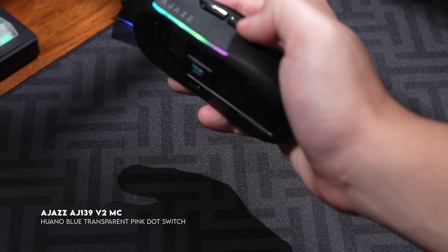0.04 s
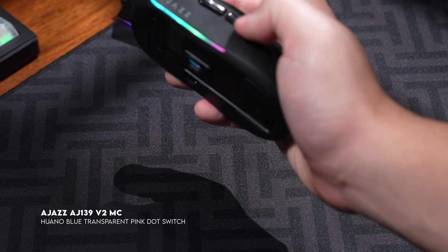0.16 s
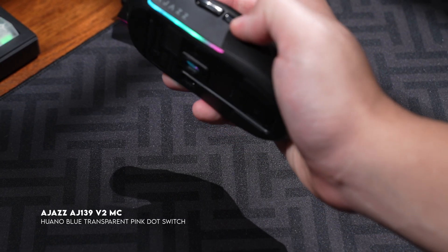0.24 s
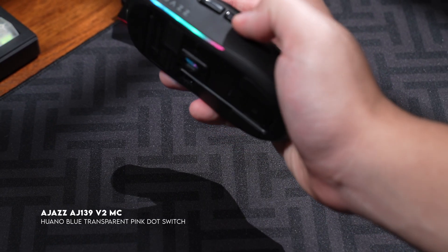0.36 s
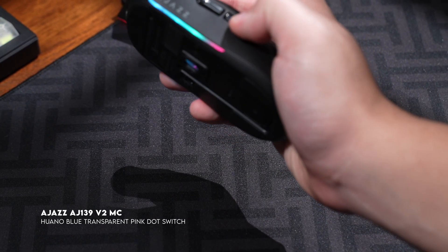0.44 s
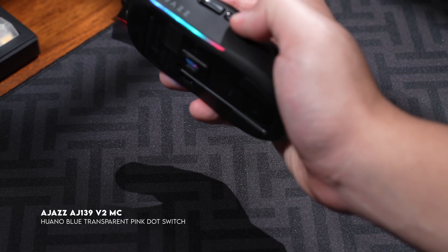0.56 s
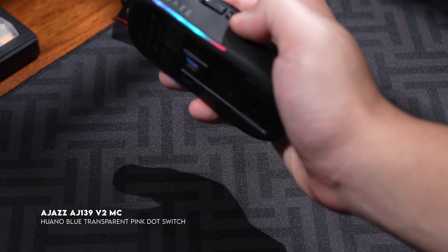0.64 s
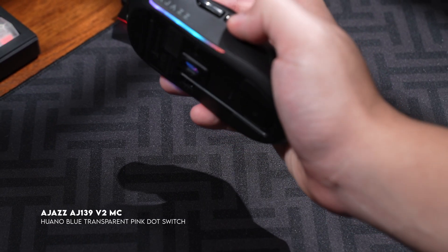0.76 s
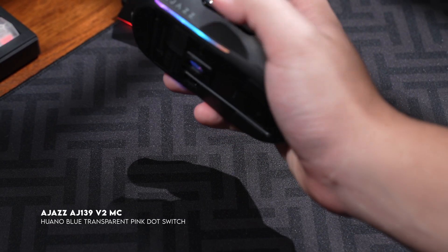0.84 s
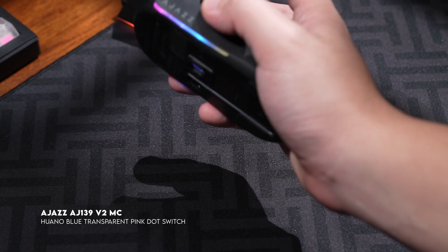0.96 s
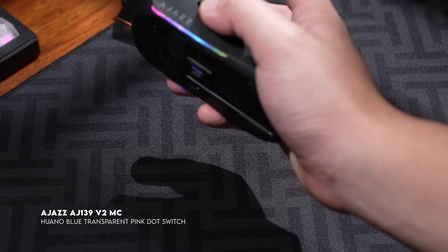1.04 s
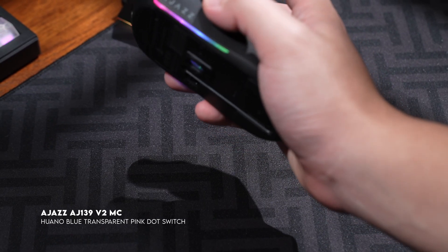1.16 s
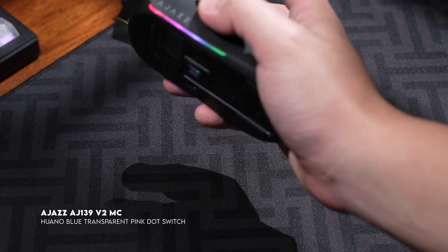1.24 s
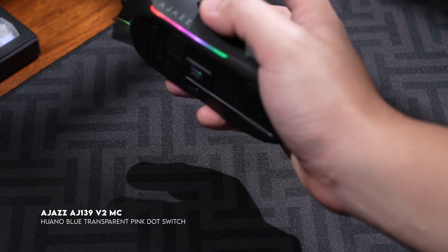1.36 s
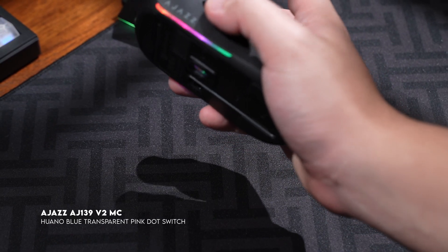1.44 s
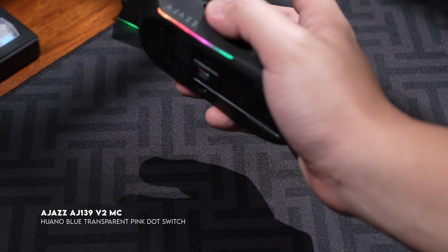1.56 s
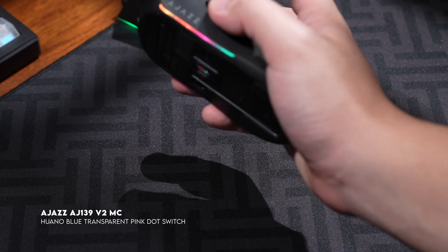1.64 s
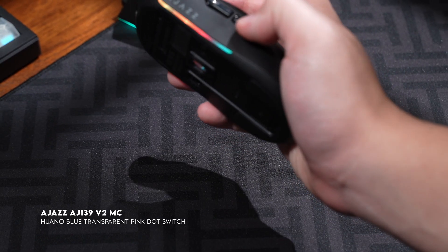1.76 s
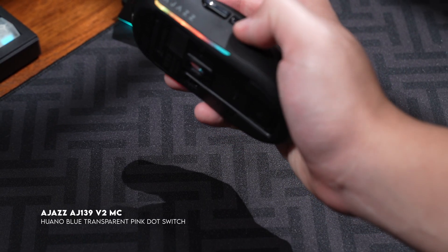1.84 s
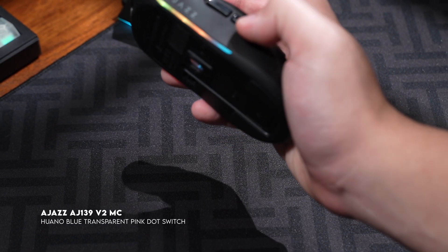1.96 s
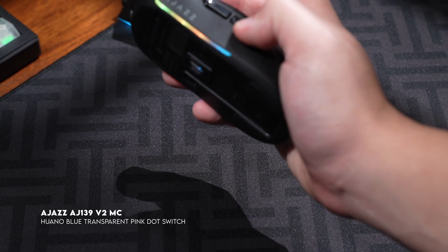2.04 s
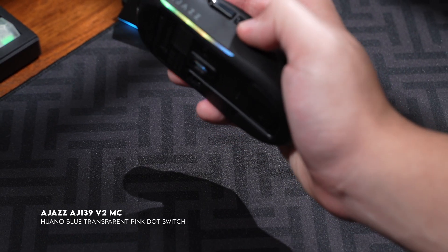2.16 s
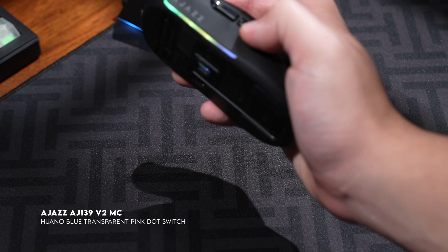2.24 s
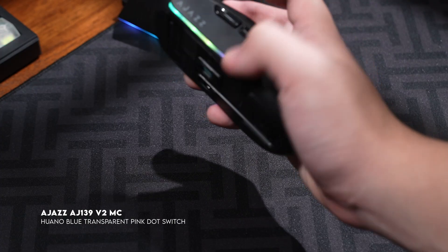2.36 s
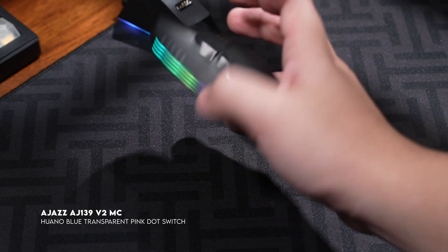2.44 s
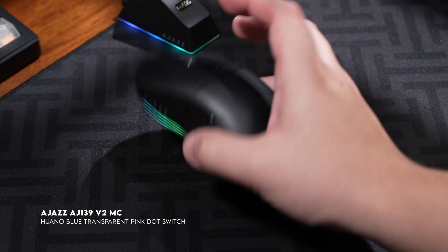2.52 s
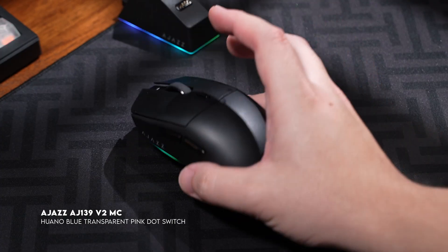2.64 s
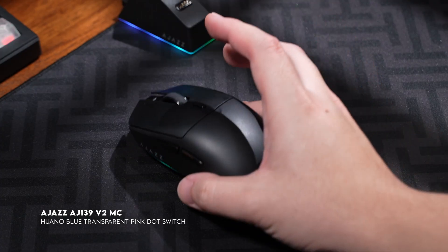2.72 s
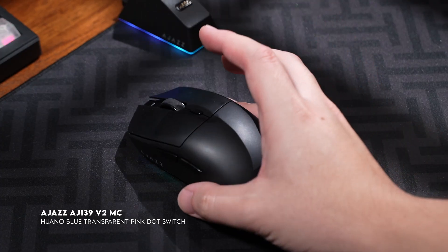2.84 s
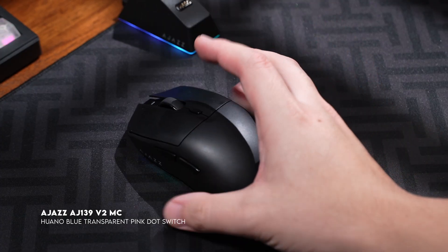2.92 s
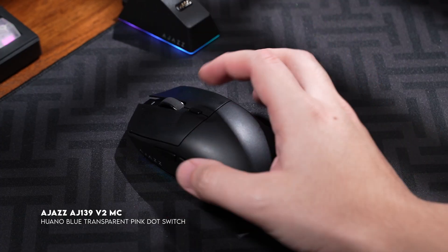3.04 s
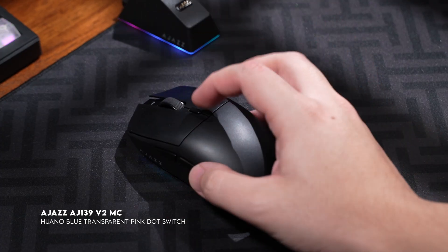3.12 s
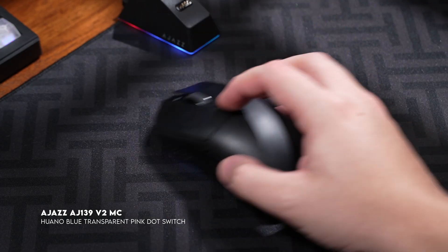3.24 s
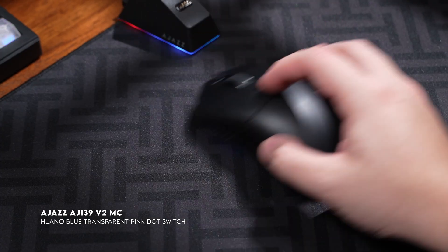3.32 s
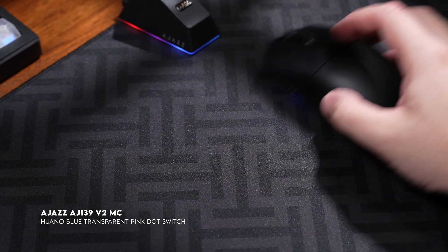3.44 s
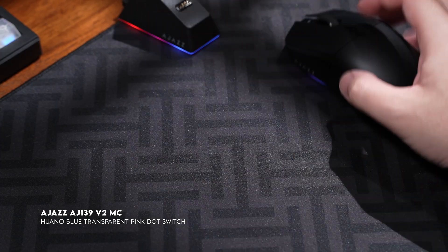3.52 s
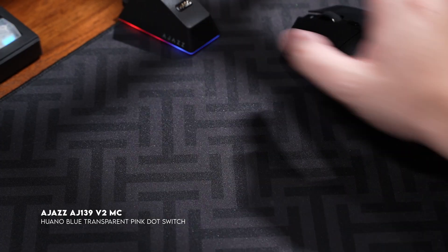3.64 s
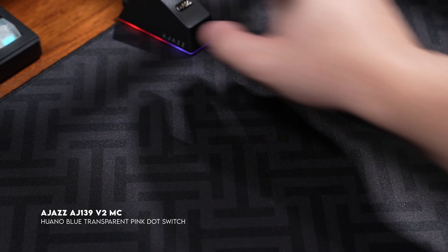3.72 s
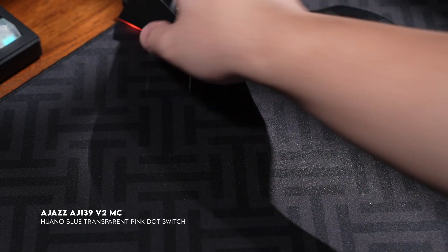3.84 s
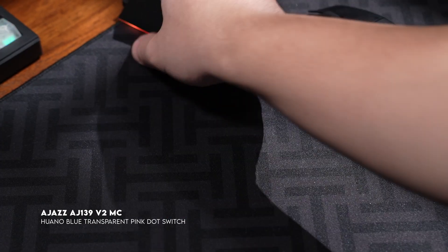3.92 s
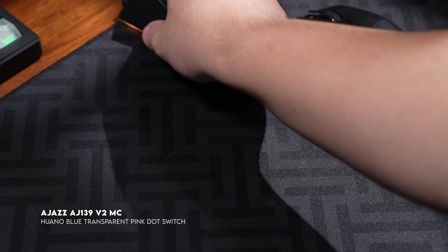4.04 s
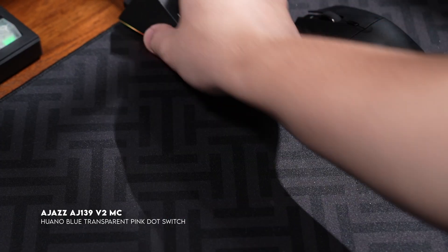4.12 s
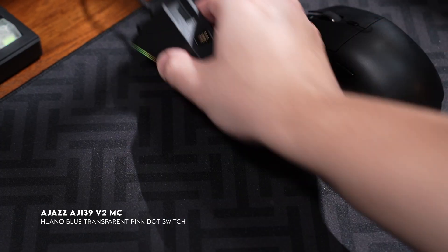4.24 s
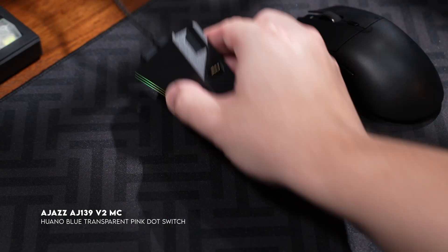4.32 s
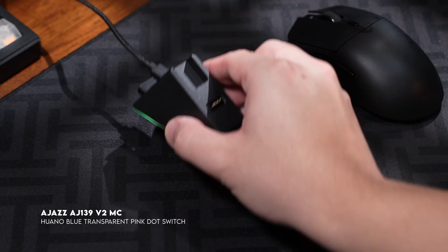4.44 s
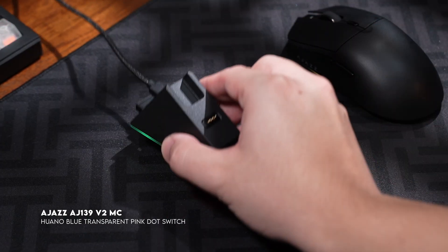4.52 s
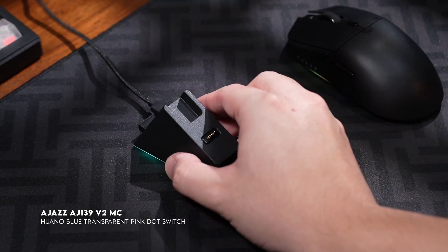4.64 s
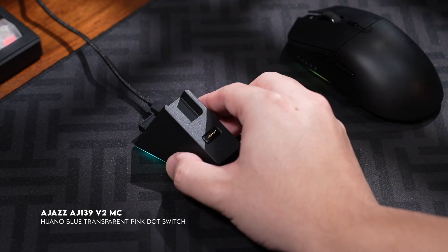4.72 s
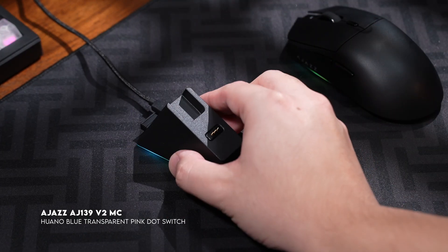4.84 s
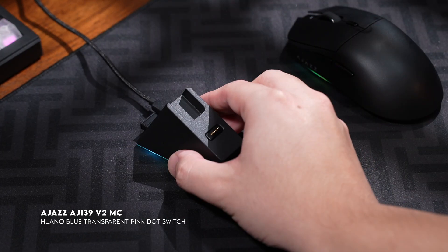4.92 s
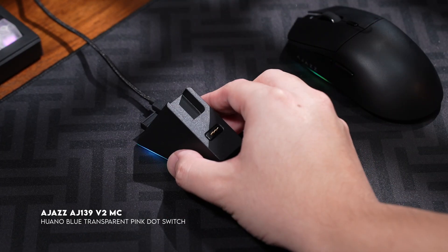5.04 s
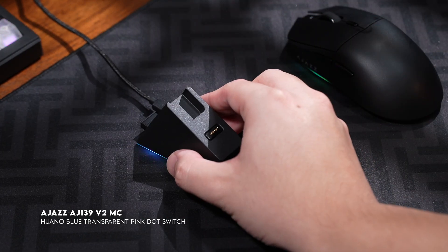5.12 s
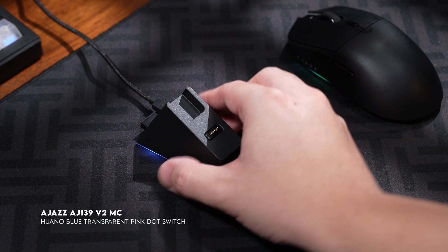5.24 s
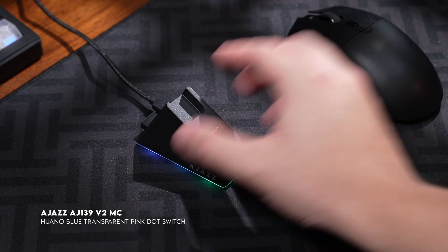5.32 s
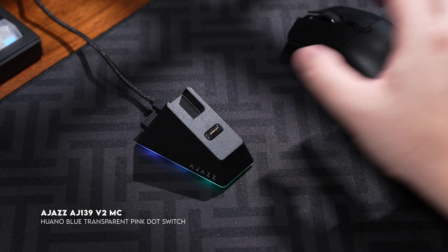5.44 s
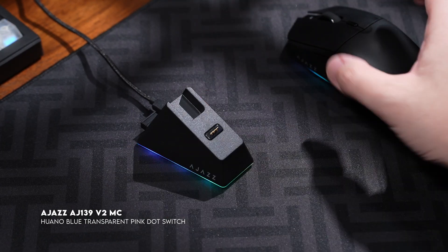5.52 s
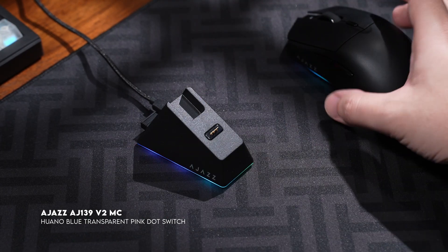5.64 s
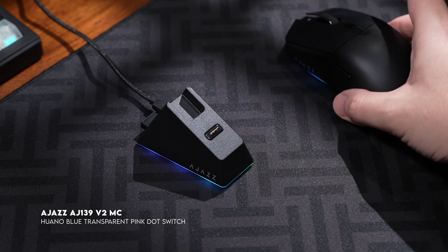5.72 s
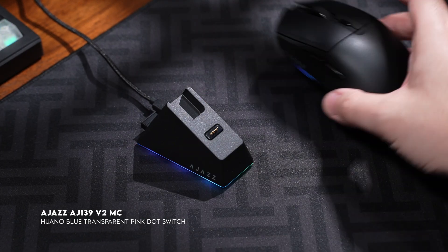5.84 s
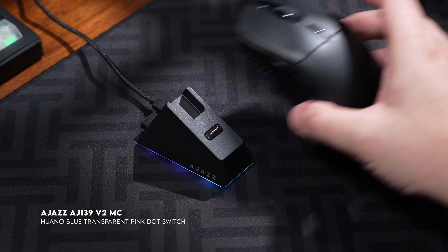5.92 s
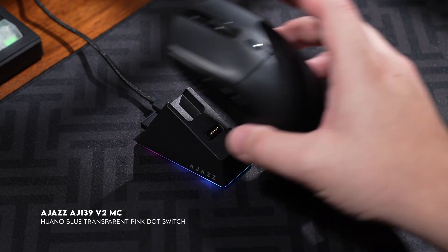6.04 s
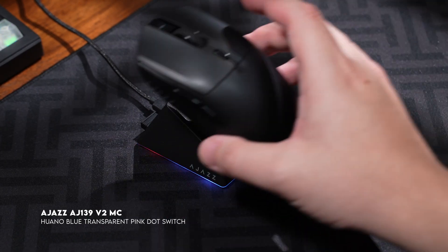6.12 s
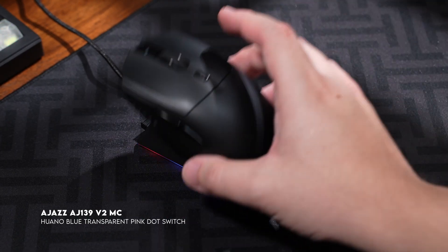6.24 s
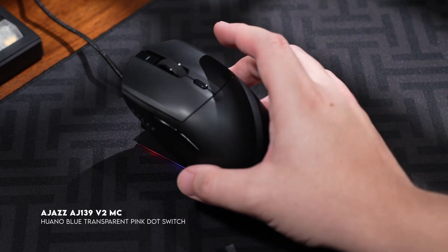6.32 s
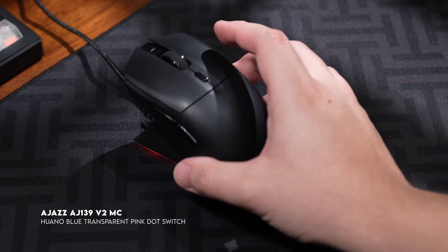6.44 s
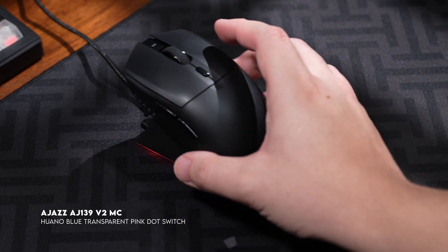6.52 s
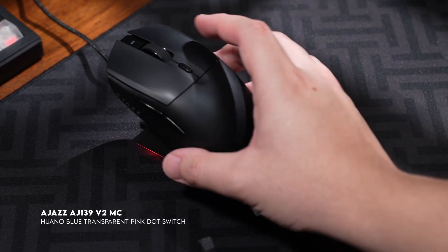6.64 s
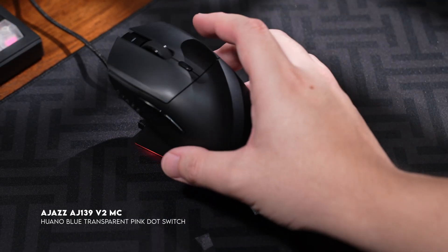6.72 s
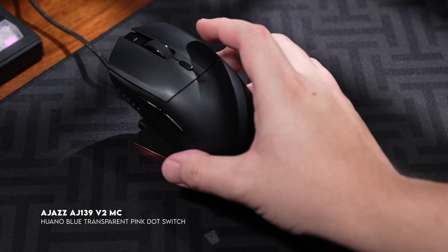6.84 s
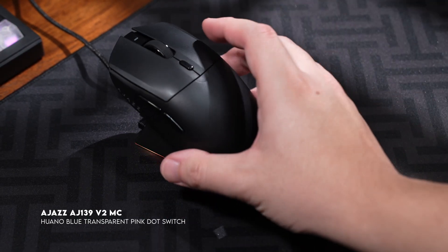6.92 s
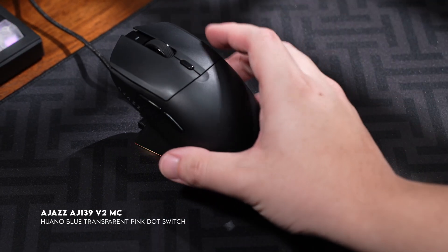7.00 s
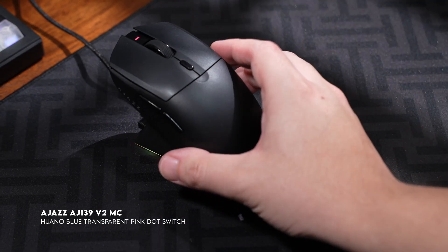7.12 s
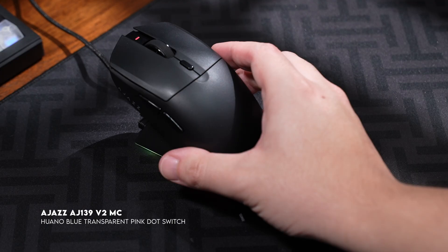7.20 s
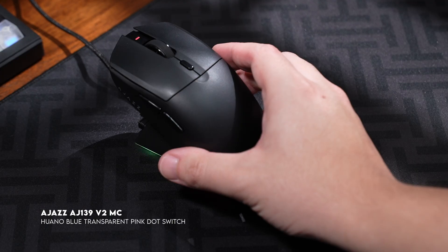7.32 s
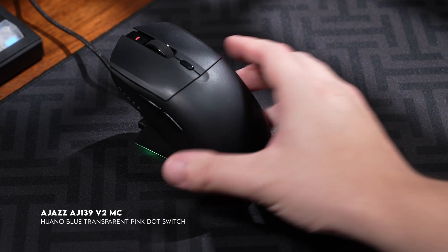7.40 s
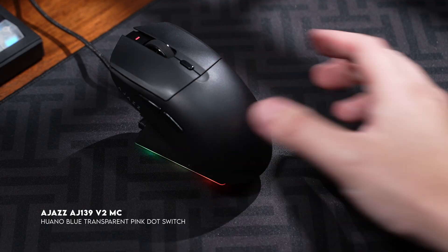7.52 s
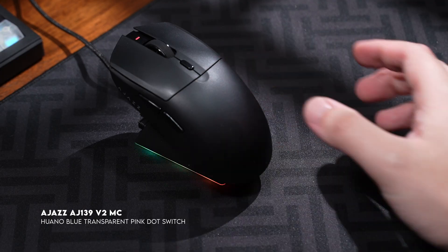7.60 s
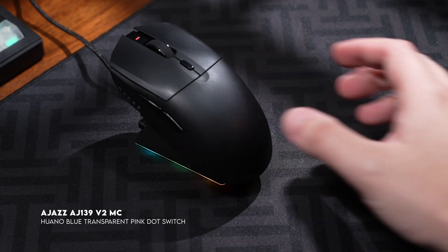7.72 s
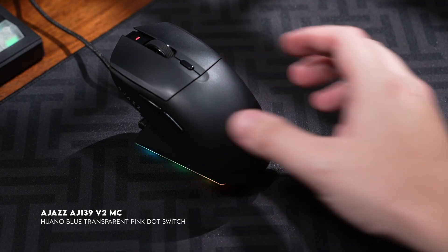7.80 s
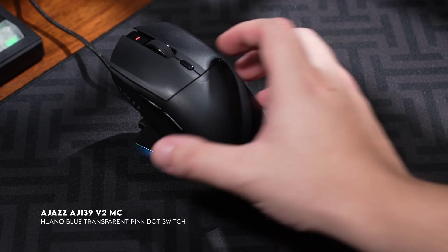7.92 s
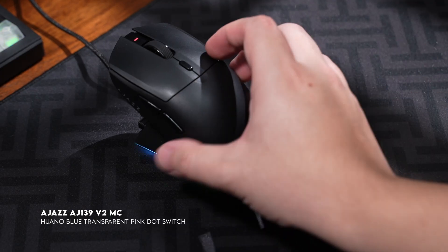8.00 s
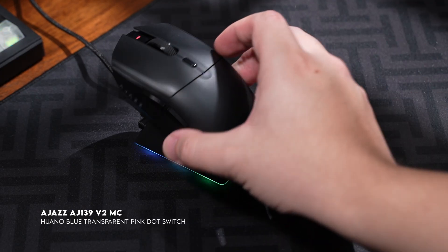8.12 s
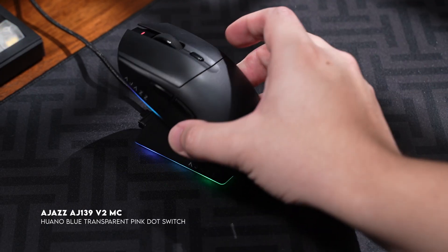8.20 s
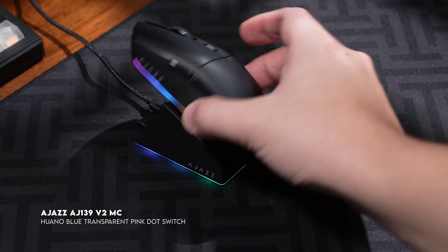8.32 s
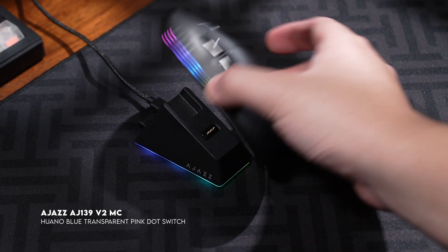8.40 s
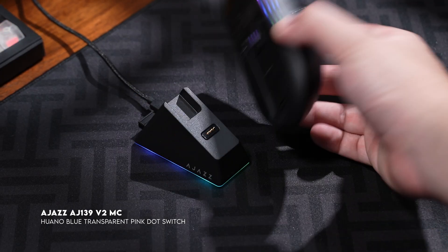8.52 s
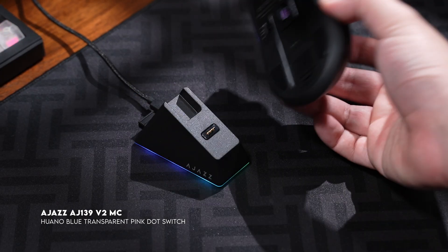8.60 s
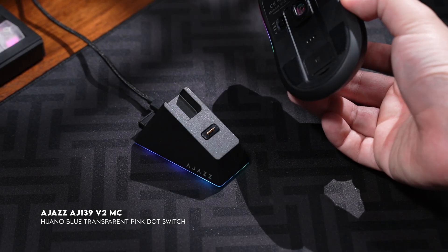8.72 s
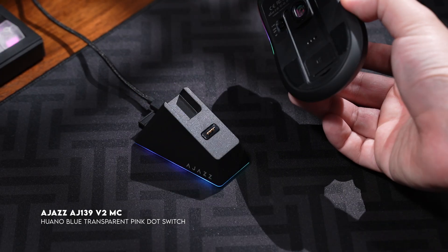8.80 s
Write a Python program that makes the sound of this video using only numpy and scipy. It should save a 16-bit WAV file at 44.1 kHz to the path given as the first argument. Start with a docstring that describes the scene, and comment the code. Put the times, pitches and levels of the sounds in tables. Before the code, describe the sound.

Crisp computer mouse clicks, press and release, for two seconds, then near quiet, a dock's thump, and sharp plastic knocks as the mouse seats on it.

```python
"""A desk in a quiet room, the microphone close to the hand. First a hand clicks the two buttons of a computer mouse,
then lays the mouse on a cloth pad, slides it aside, sets a plastic dock down, seats the mouse on it and handles it
lightly. Clicks and knocks are ringing modes and noise bursts with a short echo; strokes are shaped friction noise.
Underneath: a low hum and distant air made of filtered noise, one thin steady electronic whine and another that
comes and goes."""
import sys
import numpy as np
from scipy import signal
from scipy.fft import rfft, irfft, next_fast_len
from scipy.io import wavfile
from scipy.ndimage import uniform_filter1d, map_coordinates

SR = 44100
rng = np.random.default_rng(int(sys.argv[2]) if len(sys.argv) > 2 else 0)


def transcribe(u):
    """Save the signal u as a 16-bit wav file named by the first command-line argument.

    u: samples, shape (n,) or (channels, n), limited to [-1, 1]; the rate is SR.
    q: integer samples, one column per channel.
    """
    v = np.clip(np.atleast_2d(u).T, -1, 1)
    q = np.round(v * 32767).astype(np.int16)
    wavfile.write(sys.argv[1], SR, q)


N = 390726

# Two buttons snap down and up, a finger brushes or touches one, one comes to rest:
# (time [s], level [dB], kind)
CLICKS = [(0.0125, -26.5, "near down"), (0.2691, -28, "far down"), (0.402, -27, "far up"),
          (0.468, -38, "touch"), (0.4952, -28, "far down"), (0.6212, -25, "far up"), (0.68, -32, "touch"),
          (0.6963, -27, "far down"), (0.835, -26.5, "far up"), (0.8404, -27, "rest"),
          (0.967, -53.5, "brush"), (0.987, -57.5, "brush"), (1.0137, -28.5, "near down"),
          (1.036, -47.5, "brush"), (1.1476, -25, "near up"), (1.205, -49, "brush"),
          (1.2183, -35.5, "touch"), (1.2319, -26, "near down"), (1.3546, -24.5, "near up"),
          (1.5686, -27, "near down"), (1.6949, -24.5, "near up"), (1.7358, -36, "rest"),
          (1.8567, -28.5, "far down"), (1.9869, -25, "far up"), (2.0405, -30.5, "touch"),
          (2.0592, -27, "far down"), (2.174, -26, "far up"), (2.2131, -28.5, "far down"),
          (2.3206, -26.5, "far up"), (2.4337, -40.5, "touch"), (2.524, -56.5, "touch")]
# How hard each kind rings the parts, re the click level:
# kind: (spring [dB], shell [dB], button [dB], plunger [dB], contact [dB], blade [dB])
PART_LEVELS = {"near down": (-2, -7, -7.5, -0.4, -9, -7), "near up": (0, -11.5, -13, -2, -6, -16),
               "far down": (1, -3, -10, -13, -8, -10), "far up": (-0.5, -2.1, -4.5, -5.5, -8, -17.5),
               "brush": (-24, 3.5, -4.7, -9.5, -35, -37), "touch": (-8, -4, -2.5, -9.5, -28.5, -26),
               "rest": (-10.5, 0.8, -5.5, -10, -27, -46)}
# Modes of the parts of the mouse, each: (frequency [Hz], relative level [dB], t60 [s])
SPRING = [(5800, 0.64, 0.0079), (6524, 15, 0.0076), (6610, 2.5, 0.016), (7140, 16, 0.0045),
          (7380, 8.3, 0.0053)]
SHELL = [(870, 4, 0.034), (1049, -7.5, 0.075), (1465, 4, 0.024), (1749, 0, .015)]
BUTTON = [(2486, -2, 0.014), (2500, -8.5, 0.019), (3200, -2.5, 0.016)]
PLUNGER = [(4000, -6, 0.012), (4640, 8.5, 0.0067), (4750, -37, 0.02)]
CONTACT = [(9560, -22.5, .01), (9670, -2, 0.022), (10260, -4, 0.0086), (11100, -17, 0.03)]
BLADE = [(12100, -3.5, 0.0065), (12360, -2, 0.0073), (13600, 0, 0.0093), (15100, -13, .006)]
# Modes of each switch alone, short and lingering, by button or by kind:
# (frequency [Hz], level re the click [dB], t60 [s])
LINGER = {"near": [(6224, -3.5, 0.017), (4430, -33, .1), (6400, -32, .09), (7540, -35, .09),
          (9650, -40, .08)], "far": [(5930, -36, .07), (6550, -33, .08), (7390, -33, 0.043),
          (9970, -40, 0.064)], "near down": [(7570, -4, .014), (14250, -3, .014), (14100, -30, .1),
          (14700, -30, .1)], "near up": [(13230, -9, .012), (13500, -31, 0.092), (14030, -33.5, 0.093)]}
PITCH_DRIFT = 0.007  # scatter of mode pitch from click to click, as a fraction
SMALL_HZ = 720  # the small mouse radiates little below this


def clicks():
    """The switch spring snaps over and rings every part; each part also rattles briefly over its whole range."""
    direct, echo_feed = np.zeros(N), np.zeros(N)
    t = np.arange(SR // 6) / SR
    swell = 1 - np.exp(-(t / 0.00069) ** 2)  # the snap takes about a millisecond to build
    crack = amp(-60 * t / 0.015)
    shiver = amp(-27.5 - 60 * t / 0.09)  # faint, of the plastic
    parts = (SPRING, SHELL, BUTTON, PLUNGER, CONTACT, BLADE)
    for s, db, kind in CLICKS:
        for modes, part_db in zip(parts, PART_LEVELS[kind]):
            edges_hz = modes[0][0] * 0.9, modes[-1][0] * 1.06
            band = signal.butter(3, edges_hz, "bandpass", fs=SR, output="sos")
            noise = unit(signal.sosfilt(band, rng.standard_normal(len(t))))
            rattle = noise * (crack + shiver)
            modal = ringing(modes, 1.8, PITCH_DRIFT, size=len(t))
            add(direct, s - 0.0005, swell * (modal + 1.1 * rattle), db + part_db)
            # only the rattle feeds the echo, so it stays diffuse
            add(echo_feed, s, swell * rattle, db + part_db)
        button = kind.split()[0]
        for hz, level_db, t60 in LINGER.get(button, []) + LINGER.get(kind, []):
            wander = np.cumsum(0.15 * rng.standard_normal(len(t)))  # of the phase [rad]
            tone = amp(-60 * t / t60) * np.sin(2 * np.pi * hz * t + wander)
            add(direct, s, tone, db + level_db + rng.normal(0, 2))
    small = signal.butter(4, SMALL_HZ, "highpass", fs=SR, output="sos")
    return signal.sosfilt(small, direct), signal.sosfilt(small, echo_feed)


# Plastic set down or knocked: (time [s], clack level [dB], hollow re the clack [dB],
# brightness re the clack [dB], thud level [dB], desk level [dB], rattle length [s])
KNOCKS = [(2.8742, -55.5, 14.5, -20, -37, -31, 0.0017), (2.9612, -48.5, -6, -9, -55, -60, 0.0016),
          (4.053, -49.5, -5, -12, -48, -43, 0.0026), (4.0683, -48.5, -4, -3.5, -46.5, -41, 0.0018),
          (4.6844, -19, -5, -13, -9.5, -10.5, 0.0052), (6.3365, -28.5, -14, 11, -50, -48, 0.0014),
          (6.338, -12, -2.5, -5.5, -19, -13.5, 0.0032), (6.482, -49.5, -10.5, -6.5, -50, -39, 0.0025),
          (6.4958, -44.5, -9.5, -10, -43, -66, 0.0036), (6.6854, -12, -2, -1.46, -33, -40, 0.003),
          (6.782, -52, -5, -2, -53, -50, 0.0022), (6.794, -26.5, -6, -2.5, -50, -29, 0.0013),
          (6.8316, -26, -1.3, -4, -32.5, -26, 0.0017), (7.4265, -69, -7, 4, -57, -59, 0.0041),
          (7.997, -70, -1, -4, -47, -66, 0.0033), (8.0335, -51, 0.5, -25, -55, -52, 0.0051),
          (8.076, -59.5, -0.7, 1.1, -55, -52, 0.004), (8.1885, -55.5, -9, -4, -63, -64, 0.00275),
          (8.1956, -56, -12, -2, -57, -48, 0.0028), (8.2192, -68, 0, 3, -53, -61, 0.0013),
          (8.2314, -69, 5, 4, -54, -50, 0.0024), (8.29, -46.5, -1, -25, -35.5, -26.5, 0.0043),
          (8.3605, -47, -6, -11, -41, -32.5, 0.004), (8.412, -43, 5.5, -18, -39.5, -39, 0.0086)]
# Resonances of the plastic: clack, dock cavity, edge, brightness:
# (frequency [Hz], width [Hz], relative level [dB])
CLACK = [(1630, 130, -1.5), (1794, 210, -7), (2288, 200, 7.5), (2250, 31, -1.5)]
HOLLOW = [(900, 110, -1), (1242, 78, -9)]
EDGE = [(2890, 730, 2.5), (3720, 300, 0.5), (4000, 1000, -5), (5430, 1100, -1)]
BRIGHT = [(5410, 850, -1), (6600, 600, 0.5), (7440, 440, -6.5), (7460, 390, 4), (8700, 1200, -2.5),
          (12500, 2100, -12.5)]
EDGE_DB, EDGE_FOLLOWS = 3.54, 1  # re the clack; share of the brightness that the edge follows
DULL_HZ = 3500  # the low resonances carry little above this
# Modes of the thud through the pad: (frequency [Hz], relative level [dB], t60 [s])
THUD = [(259, -2, 0.12), (312, 7.5, .04), (367, -1, 0.054), (452, -10.5, 0.11), (535, -8, 0.016),
        (598, -14, 0.032), (755, -7, 0.05)]
# Modes of the desk top, also rung by the shakes: (frequency [Hz], relative level [dB], t60 [s])
DESK = [(40.7, -7, 0.055), (75.6, 1.5, 0.16), (112.3, 4.5, 0.15), (163.3, 0.5, .2)]
# The empty dock rings as it is set down: (frequency [Hz], level [dB], t60 [s])
DOCK = [(534, -17.5, 0.075), (657, -26.5, 0.05), (760, -30, .03), (1323, -24, 0.046), (2344, -23.5, 0.044),
        (4030, -25, 0.036)]
DOCK_DOWN_S = 4.6855


def knocks():
    """Plastic rattles on plastic for a few milliseconds while a soft push thuds and rings the desk."""
    plastic, desk = np.zeros(N), np.zeros(N)
    t = np.arange(SR // 6) / SR
    push = np.hanning(round(0.00089 * SR))
    for s, db, hollow_db, bright_db, thud_db, desk_db, length in KNOCKS:
        rattle = np.pad(chatter(length, spiky=2.1), (0, SR // 10))
        dull = filtered(rattle, lambda hz: 1 / (1 + 1j * hz / DULL_HZ) ** 2)
        edge_db = EDGE_DB + EDGE_FOLLOWS * bright_db
        layers = ((dull, CLACK, 0), (dull, HOLLOW, hollow_db),
                  (rattle, EDGE, edge_db), (rattle, BRIGHT, bright_db))
        for source, peaks, part_db in layers:
            add(plastic, s - 0.001, resonant(source, peaks), db + part_db, size=128)
        thud = sum(amp(level - 60 * t / t60) * np.sin(2 * np.pi * hz * t) for hz, level, t60 in THUD)
        add(desk, s, -thud * (1 - np.exp(-t / 0.003)), thud_db, size=256)
        desk_ring = np.convolve(push, ringing(DESK, 1, 0.005, size=SR // 3))
        add(desk, s + 0.002, desk_ring, desk_db, size=512)
    i = round(DOCK_DOWN_S * SR)
    dock_ring = ringing(DOCK, 0.89, 0.002, size=len(t))
    plastic[i:i + len(t)] += dock_ring * (1 - np.exp(-t / 0.00072))
    return plastic, desk


def chatter(length, spiky):
    """Tiny impacts that swell and die within a few lengths [s]."""
    u = np.arange(SR // 20) / SR / max(length, 1e-4)
    x = rng.standard_normal(len(u))
    x = np.sign(x) * np.abs(x) ** spiky * np.sqrt(u) * np.exp(-1.5 * u)
    return x / np.linalg.norm(x)


# Strokes on cloth and plastic: (start [s], rise [s], hold [s], fall [s],
# low hiss level [dB], high hiss level [dB], plastic scrape level [dB])
RUBS = [(2.356, 0.023, 0.016, 0.093, -68, -65, -77), (2.618, .02, .01, .04, -76, -79, -78),
        (2.836, 0.033, 0.012, .1, -81, -86, -57.5), (2.914, 0.019, 0.17, .08, -76, -76, -76),
        (3.116, 0.19, 0.24, 0.14, -77, -66.5, -77), (3.993, 0.013, 0.057, 0.055, -78, -63, -66),
        (4.063, 0.036, .05, .2, -86, -83, -79), (4.2, 0.095, 0.017, 0.098, -64, -67.5, -66),
        (4.324, .03, 0.038, 0.27, -69.5, -76.5, -76), (5.08, .03, 0.019, 0.071, -95.5, -84.5, -95),
        (5.257, 0.037, 0.021, 0.042, -75, -64.5, -70), (5.722, 0.031, 0.0061, 0.059, -65, -70.5, -69),
        (5.792, 0.017, 0.018, .06, -87, -77.5, -80), (6.472, 0.011, 0.018, 0.047, -69, -66, -56.5),
        (6.604, .01, 0.04, 0.064, -59, -73, -56), (6.594, 0.087, 0.016, 0.023, -34.5, -44.5, -37.5),
        (6.763, 0.024, 0.012, .02, -47.5, -67, -48.5), (6.959, 0.0119, 0.0068, 0.028, -73.5, -74.5, -84),
        (7.056, 0.012, .06, 0.066, -70, -71, -73), (7.409, 0.014, .01, 0.076, -81.5, -75.5, -81),
        (8.079, 0.014, 0.029, 0.066, -80, -65.5, -66), (8.173, .012, 0.011, 0.07, -80, -81, -67),
        (8.276, 0.01, .01, 0.06, -83, -81.5, -73), (8.326, 0.027, 0.0087, 0.039, -57.5, -78, -60),
        (8.392, 0.02, .008, 0.053, -54.5, -73, -46)]
# Spectrum of the cloth: (frequency [Hz], relative level per Hz [dB])
CLOTH = [(1180, -21), (2000, -8.5), (2770, 2.5), (4240, -2), (7930, -9.5), (14500, -23.5), (15900, -27),
         (16500, -43.5)]
# Rustle after a knock, one row for each of low hiss, high hiss and scrape: (level re the clack [dB])
SETTLE_DB = [
    [-28],
    [-31.5],
    [-23.5],
]
# The same rows: (share of the knock's brightness that the rustle follows)
SETTLE_FOLLOWS = [
    [.3],
    [.6],
    [0],
]
SETTLE_T60_S = 0.26
FIDGET_DB = -94.5  # middle level of the faint handling throughout
SPLIT_HZ = 5500  # between low and high hiss


def rubs():
    """Friction: a grainy hiss of cloth and a scrape in the plastic's resonances, in strokes and after knocks."""
    gain = np.full((3, N + SR), amp(FIDGET_DB))
    gain[:, :N] *= amp(6 * wobble(8))
    for start, rise, hold, fall, *layers_db in RUBS:
        gain[:, :N] += amp(layers_db)[:, None] * stroke(start, rise, hold, fall)
    t = np.arange(SR // 2) / SR
    for s, db, _, bright_db, *_ in KNOCKS:
        settle_db = db + np.array(SETTLE_DB) + bright_db * np.array(SETTLE_FOLLOWS)
        gain[:, round(s * SR):][:, :len(t)] += amp(settle_db - 60 * t / SETTLE_T60_S)
    grains = rng.standard_normal((2, N)) * amp([1.2 * wobble(300), 2.5 * wobble(150)])
    hiss = filtered(patchy(grains[0], patchy_db=1.3), lambda hz: amp(along(CLOTH, hz)))
    low = filtered(hiss, lambda hz: 1 / (1 + (hz / SPLIT_HZ) ** 4))
    # (frequency [Hz], width [Hz], relative level [dB])
    scrape_peaks = [(970, 300, -6.5), (1980, 500, -3.0), (2372, 1800, -12), (5500, 2500, -16.5)]
    scrape = resonant(patchy(grains[1], patchy_db=1.5), scrape_peaks)
    return sum(g * unit(x) for g, x in zip(gain[:, :N], (low, hiss - low, scrape)))


# Plastic on plastic: (start [s], rise [s], hold [s], fall [s], frequency [Hz], width [Hz], level [dB])
SQUEAKS = [(2.34, .015, 0.08, .02, 1590, 120, -70), (6.475, .008, 0.023, .02, 2100, 300, -51),
           (6.595, .01, 0.054, .04, 2018, 450.6, -46.5), (8.08, .015, 0.042, .03, 2160, 159.6, -64.5)]


def squeaks():
    """Plastic squeaks on plastic: noise sung twice through one narrow resonance."""
    out = np.zeros(N)
    for *shape, hz, width_hz, db in SQUEAKS:
        peak = [(hz, width_hz, 0)]
        sung = resonant(resonant(rng.standard_normal(N), peak), peak)
        out += amp(db) * stroke(*shape) * unit(sung)
    return out


# The desk shaken by the hand: (start [s], rise [s], hold [s], fall [s], level [dB])
SHAKES = [(2.8, 0.067, 0.0086, 0.077, -35), (3.93, 0.089, 0.0092, .17, -46.5),
          (6.62, 0.071, 0.028, 0.33, -29), (8.283, .02, 0.023, .08, -40), (8.34, .03, 0.057, 0.11, -42)]


def shakes():
    """Random pushes keep the desk modes rumbling while the hand works."""
    gain = sum(amp(db) * stroke(*shape) for *shape, db in SHAKES)
    peaks = [(hz, 2.2 / t60, db) for hz, db, t60 in DESK]  # a mode's width is 2.2 / t60
    return gain * unit(resonant(rng.standard_normal(N), peaks))


# Echo of the room: (frequency [Hz], t60 [s])
ROOM = [(300, 0.3), (1500, 0.26), (5000, 0.21), (12000, 0.067)]


def room(x, piece=SR // 10):
    """Each frequency of the echo dies at its own speed; the echo is a fresh random tail for each short piece."""
    out = np.zeros(N + SR)
    for i in range(0, N, piece):
        hz, t, z = signal.stft(rng.standard_normal(SR // 2), SR, nperseg=256)
        decay = amp(-60 * t / along(ROOM, hz)[:, None])
        tail = signal.istft(z * decay, SR, nperseg=256)[1]
        wet = signal.fftconvolve(x[i:i + piece], tail / np.linalg.norm(tail))
        start = i + 200  # the echo begins 200 samples after the direct sound
        out[start:start + len(wet)] += wet
    return out[:N]


# Spectrum of the room tone: (frequency [Hz], relative level per Hz [dB])
AIR = [(12, -51), (20, -25), (43, -1.5), (77, -16), (102, -1), (139, -6.5), (174, -4.5), (224, -13.5),
       (258, -8), (351, -11), (416, -21), (888, -26), (2180, -38), (6710, -49), (16500, -63)]
# Level of the low hum: (time [s], gain [dB])
HUM = [(0.0, -52), (2.2, -51.5), (3.77, -56.5), (4.9, -54), (6.4, -54.5), (7.4, -55.5), (8.86, -56.5)]
# The whine follows the nearness of the mouse: (time [s], level [dB])
WHINE = [(0, -86), (2.35, -85.5), (2.55, -108), (5.75, -108), (5.95, -94.5), (6.12, -80.5), (6.35, -88),
         (7.0, -94.5), (7.2, -99), (8.15, -96), (8.32, -81.5), (8.5, -88.5), (8.86, -93.5)]
WHINE_HZ = 11122
FAR_WHINE_HZ, FAR_WHINE_DB = 8032, -96


def room_tone():
    """Filtered noise as a low hum, louder in the first seconds, and steady distant air; two thin electronic whines."""
    t = np.arange(N) / SR
    air = unit(filtered(rng.standard_normal(N), lambda hz: amp(along(AIR, hz))))
    hum = filtered(air, lambda hz: 1 / (1 + (hz / 600) ** 4))
    hum_gain = amp(curve(HUM) + 0.4 * wobble(18))
    whine = np.sqrt(2) * np.sin(2 * np.pi * WHINE_HZ * t + 0.6 * wobble(30))
    whine_gain = amp(curve(WHINE) + 1.5 * wobble(40))
    far_whine = np.sqrt(2) * np.sin(2 * np.pi * FAR_WHINE_HZ * t + 1.5 * wobble(60))
    whines = whine_gain * whine + amp(FAR_WHINE_DB) * far_whine
    return hum_gain * hum + amp(-53) * (air - hum) + whines


def amp(db):
    """Gain of a level in dB."""
    return 10 ** (np.asarray(db) / 20)


def unit(x):
    """Scaled to rms 1."""
    return x / np.sqrt(np.mean(x ** 2) + 1e-20)


def along(points, hz):
    """(frequency [Hz], value) points read on a log axis."""
    f, v = np.transpose(points)
    return np.interp(np.log(hz + 1), np.log(f + 1), v)


def curve(rows):
    """One dB value per sample from (time [s], level [dB]) rows; silent outside them."""
    s, db = np.transpose(rows)
    return np.interp(np.arange(N) / SR, s, db, left=-120, right=-120)


def wobble(rate):
    """A smooth random curve, rate knots a second."""
    knots = rng.standard_normal(int(N * rate / SR) + 4)
    return map_coordinates(knots, [np.arange(N) * rate / SR])


def stroke(start, rise, hold, fall, depth_db=30.5):
    """Gain that rises and falls by depth_db around a hold, straight in dB; silent outside."""
    corners = start + np.cumsum([0, rise, hold, fall])
    db = np.interp(np.arange(N) / SR, corners, [-depth_db, 0, 0, -depth_db], left=-120, right=-120)
    return amp(db)


def patchy(x, patchy_db):
    """Random gain in small patches of time and frequency."""
    z = signal.stft(x, nperseg=256)[2]
    field = uniform_filter1d(rng.standard_normal(z.shape), size=5, axis=0)
    field = uniform_filter1d(field, size=7, axis=1)
    return signal.istft(z * amp(patchy_db * unit(field)), nperseg=256)[1][:len(x)]


def filtered(x, response):
    """x times a complex response of frequency."""
    m = next_fast_len(len(x) + SR // 2)
    return irfft(rfft(x, m) * response(np.fft.rfftfreq(m, 1 / SR)), m)[:len(x)]


def resonant(x, peaks):
    """x through causal (frequency [Hz], width [Hz], level [dB]) resonances of alternating sign."""
    def response(f):
        return sum((-1) ** k * amp(db) * 1j * f * w / (c * c - f * f + 1j * f * w)
                   for k, (c, w, db) in enumerate(peaks))
    return filtered(x, response)


def ringing(modes, scatter_db, drift, size):
    """Damped sines of alternating sign; their strength and pitch scatter a little at random each time."""
    t = np.arange(size) / SR
    out = np.zeros(size)
    for k, (hz, db, t60) in enumerate(modes):
        strength, pitch = rng.standard_normal(2)
        decay = amp(db + scatter_db * strength - 60 * t / t60)
        out += (-1) ** k * decay * np.sin(2 * np.pi * hz * (1 + drift * pitch) * t)
    return out


def add(track, s, sound, db, size=48):
    """Mixes a sound in at time s [s] with the top of its envelope, smoothed over size samples, at db."""
    i = round(s * SR)
    top = np.sqrt(2 * np.abs(uniform_filter1d(sound ** 2, size)).max())
    track[i:i + len(sound)] += (amp(db) * sound / top)[:len(track) - i]


def scene():
    """Close sounds at the desk, their room echo and the background."""
    click, click_echo_feed = clicks()
    plastic, desk = knocks()
    echo = room(amp(-21.5) * click_echo_feed + amp(-22.0) * plastic + amp(-10.5) * desk)
    handling = rubs() + squeaks() + shakes()
    return (click + plastic + desk + echo + handling + room_tone())[None]


ROLL_OFF_HZ, TOP_HZ = 15200, 16700  # microphone fade; upper limit of the sound


def record(dry):
    """The microphone fades in the top treble; nothing sounds above TOP_HZ."""
    return filtered(dry[0], lambda hz: (hz < TOP_HZ) / np.sqrt(1 + (hz / ROLL_OFF_HZ) ** 20))[None]


dry = scene()
out = record(dry)
transcribe(out)
```